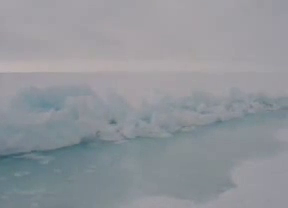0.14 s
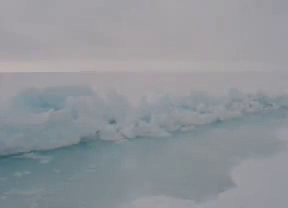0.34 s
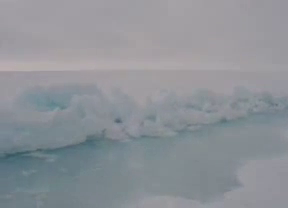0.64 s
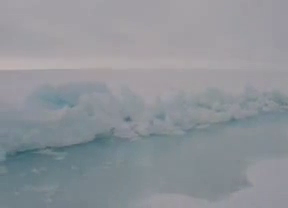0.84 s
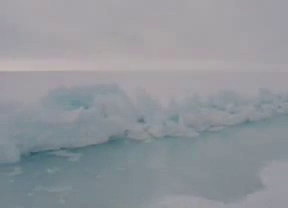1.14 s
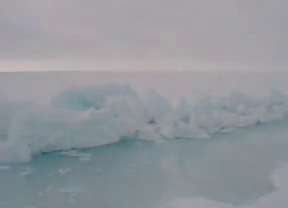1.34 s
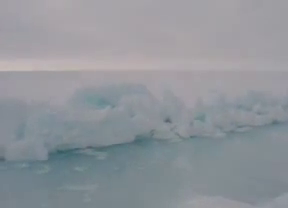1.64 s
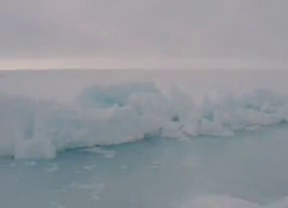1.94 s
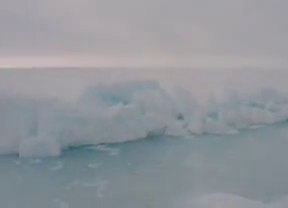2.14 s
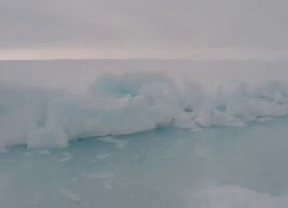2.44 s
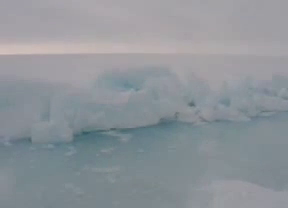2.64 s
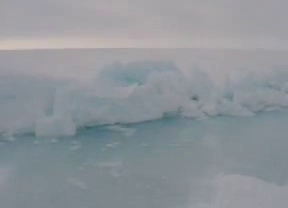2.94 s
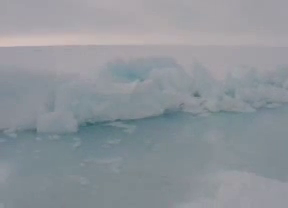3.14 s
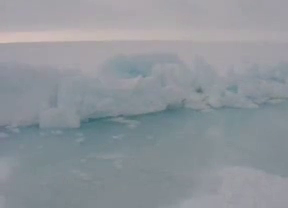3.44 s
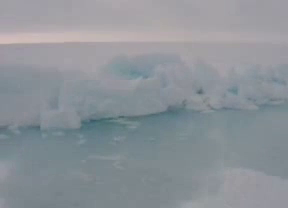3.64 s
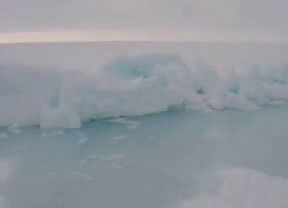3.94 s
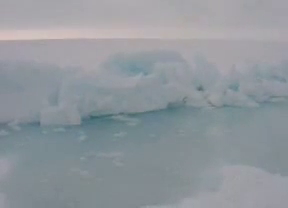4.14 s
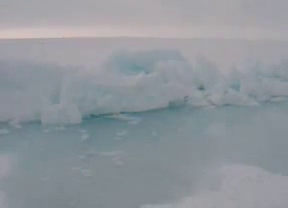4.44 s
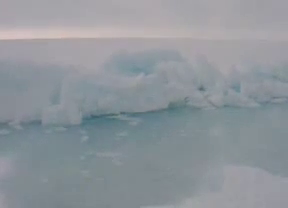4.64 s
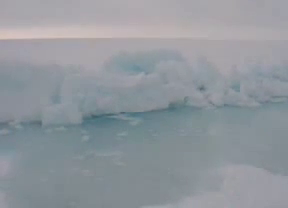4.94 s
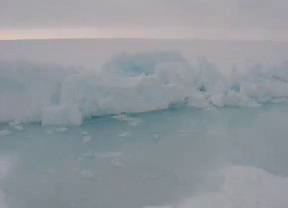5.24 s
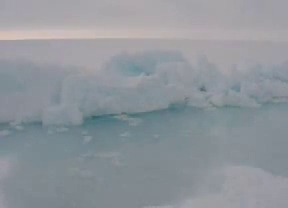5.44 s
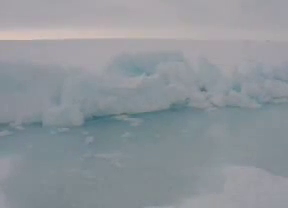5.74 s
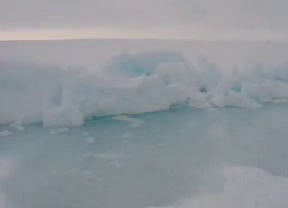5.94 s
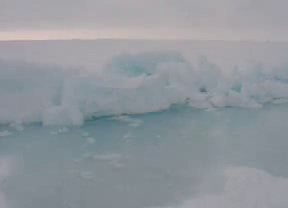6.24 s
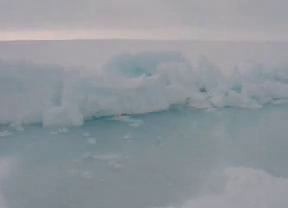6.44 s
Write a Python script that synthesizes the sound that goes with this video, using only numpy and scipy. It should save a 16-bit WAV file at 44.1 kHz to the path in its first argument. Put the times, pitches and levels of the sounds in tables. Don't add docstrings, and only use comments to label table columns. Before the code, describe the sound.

From 0 s, sea ice grinds in a harsh, continuous stuttering buzz: about forty tight slips a second, each a bright crack near 5 kHz with a duller icy body ringing at 1-3 kHz. It dips around 1 s, then swells unevenly and quickens to fifty or more a second by 3.5-4.5 s. Crushed ice hisses grainily over faint lapping water. A broad scrape and tiny chirps come at 0.6-1.1 s; dull block knocks scatter throughout, with a stronger one and a bright scrape near 3.3 s. Soft low wind thumps hit the microphone, mostly from 1.6 s and firmest at 3.9-5 s. At about 5 s the buzz slows and hardens; from 5.4 s it becomes a rattle of separate uneven jolts, about twenty-five a second. A thin wavering squeal near 850 Hz enters at 5.8 s, rising to 920 Hz by 6.4 s as crushing grows. Dry open air, coarse limited recorder tone, ending at 6.6 s.

```python
import sys
import numpy as np
from scipy import signal
from scipy.fft import rfft, irfft, next_fast_len
from scipy.io import wavfile
from scipy.ndimage import uniform_filter1d

SR = 44100
rng = np.random.default_rng(int(sys.argv[2]) if len(sys.argv) > 2 else 0)


def int16_out(signal):
    q = np.round(np.clip(np.atleast_2d(signal).T, -1, 1) * 32767)
    wavfile.write(sys.argv[1], SR, q.astype(np.int16))


def boost_factor(decibels):
    exponent = np.asarray(decibels, float) / 20
    return 10 ** exponent


N = 290619
SLIP_S, TAIL_S = 0.004, 0.006
MAX_SLIPS = 400


# pitch_hz, width_hz, level_db
CRACK_RINGS = [(5006, 346, -1), (4643, 570, -5.5), (3440, 620, -9.5), (4260, 3600, -10.5),
               (5360, 460, -6.5)]
# pitch_hz, width_hz, level_db
BODY_RINGS = [(1310, 500, -4.5), (1804, 500, -6), (2284, 254, -2.5), (2717, 340, -3), (846, 270, -8),
              (465, 300, -8)]
# time_s, along (-1..1), depth (-1..1)
CONTACT_PATH = [(0.0, 0.26, -.9), (.3, -.6, -0.87), (.6, -.8, -0.4), (1.1, 0.18, -.2), (1.5, -1.5, -.3),
                (2.1, -0.73, 0.53), (2.4, -0.29, 0.65), (2.8, 0.21, 0.34), (3.3, -0.092, 0.3),
                (3.6, 0.065, .1), (3.9, -0.099, .85), (4.2, -.4, -0.0071), (4.5, 0.032, -.15),
                (4.8, .3, 1.1), (5.15, 0.75, 0.69), (5.7, -0.21, -0.28), (6.29, -0.5, 0.38),
                (6.59, 0.27, -0.87)]


def slips(count=6):
    s, peak_db = slip_list()
    lead_s = 0.0004
    at = ((s - lead_s) * SR).astype(int)
    place = np.array(in_time(CONTACT_PATH))[:, at]
    moves = np.array([(13, 0.1), (0.1, 8.5), (0.1, 5.8), (-2.1, 0.6)])
    second, third, broad, fourth = moves @ place
    when = rng.random((MAX_SLIPS, count))[:len(s)]
    when[:, 0] = 0
    even = np.zeros(len(s))
    crack = struck(CRACK_RINGS, [even, second, third, broad, even], at, when)
    body = struck(BODY_RINGS, [even, even, even, fourth, even, even], at, when)
    usual_db, body_follows = -18.0, 0.6
    calmed_db = usual_db + body_follows * (peak_db - usual_db)
    scatter_db = 1.7 * rng.standard_normal(MAX_SLIPS)[:len(s)]
    body_db = np.minimum(peak_db, calmed_db) - 9.5 + scatter_db
    return to_height(crack, at, peak_db - 5.5) + to_height(body, at, body_db - 3.5)


# start_s, gap_ms, peak_db, swell_db (per slip)
SLIP_RUNS = [(0.0263, 26.65, -17.0, -0.28), (0.21, 25.38, -16.1, -0.42), (0.3849, 28.71, -17.5, 0.09),
             (0.554, 23.21, -19.1, 0.62), (0.6666, 24.66, -19.9, 0.13), (1.0065, 24.11, -23.2, 1.17),
             (1.1939, 24.08, -18.7, 0.59), (1.2975, 24.53, -18.4, -0.01), (1.5381, 24.93, -15.4, -0.53),
             (1.7111, 21.1, -15.4, -2.74), (1.7762, 19.45, -18.2, -0.21), (2.0323, 21.84, -19.5, -0.15),
             (2.2094, 23.37, -19.4, 0.1), (2.5324, 22.25, -16.8, 0.07), (2.8914, 22.28, -15.9, -0.09),
             (3.1133, 19.87, -15.5, -0.16), (3.3947, 20.34, -17.7, 0.02), (3.6587, 17.95, -19.4, 0.73),
             (3.7261, 24.28, -22.1, 3.37), (3.7923, 23.46, -18.3, -0.01), (3.9264, 21.14, -17.8, -0.19),
             (4.1145, 17.64, -15.0, -0.18), (4.455, 17.51, -19.3, -0.72), (4.5077, 20.59, -16.8, -0.95),
             (4.5777, 21.13, -17.2, -0.16), (4.692, 20.02, -18.3, -0.16), (4.9012, 19.56, -17.7, 0.38),
             (4.9569, 27.81, -17.0, 0.4), (5.0503, 35.13, -13.8, 0.06), (5.2209, 32.37, -13.7, 0.11)]
# start_s, peak_db
SINGLE_JOLTS = [(5.4415, -14.5), (5.474, -13), (5.4981, -17), (5.53, -15), (5.566, -12.5), (5.6, -12.0),
                (5.6428, -14.5), (5.6735, -16), (5.7062, -16.5), (5.7411, -15.5), (5.778, -14.6),
                (5.823, -14.5), (5.8587, -14.5), (5.8957, -13.5), (5.9304, -13), (5.9777, -12.0),
                (6.019, -15.5), (6.0583, -11.5), (6.0937, -13.5), (6.1348, -14.5), (6.1778, -15),
                (6.2227, -13.5), (6.2651, -16.8), (6.3099, -14), (6.3488, -13.5), (6.3866, -10.5),
                (6.4237, -13), (6.4681, -16.5), (6.5151, -17.5), (6.567, -13)]


def slip_list():
    ends = [row[0] for row in SLIP_RUNS[1:]] + [SINGLE_JOLTS[0][0]]
    rows = []
    for (start_s, gap_ms, peak_db, swell_db), end_s in zip(SLIP_RUNS, ends):
        slip_count = int(np.ceil((end_s - start_s) * 1000 / gap_ms - 0.55))
        for k in range(slip_count):
            rows.append((start_s + k * gap_ms / 1000, peak_db + k * swell_db))
    chance = rng.standard_normal((MAX_SLIPS, 3))
    s, db = np.transpose(rows)
    db = db + 0.95 * chance[:len(s), 0]
    jolt_s, jolt_db = np.transpose(SINGLE_JOLTS)
    s, db = np.append(s, jolt_s), np.append(db, jolt_db)
    long_stick_s, after_s, after_spread_s = 0.028, 0.02, 0.002
    after_db, after_scatter_db = -16, 1
    long = np.flatnonzero(np.diff(s) > long_stick_s)
    s = np.append(s, s[long] + after_s + after_spread_s * np.clip(chance[long, 1], -2, 2))
    db = np.append(db, db[long] + after_db + after_scatter_db * chance[long, 2])
    order = np.argsort(s)
    return s[order], db[order]


def struck(modes, favour_db, first, when):
    out = np.zeros(N)
    for (hz, width, mode_db), shift_db in zip(modes, favour_db):
        in_step = np.cos(2 * np.pi * hz * np.floor(SLIP_S * SR * when) / SR)
        uneven = 0.35 * rng.standard_normal((MAX_SLIPS, when.shape[1]))[:len(when)]
        direction = rng.choice([-1, 1], (MAX_SLIPS, 1))[:len(when)]
        size = (in_step + uneven) * np.exp(-2.1 * when) * direction
        force = slip_force(first, when, size, mode_db + shift_db, crumble_db=-12.5)
        out += resonance(resonance(force, hz, width), hz, width)
    return out


def slip_force(first, when, size, level_db, crumble_db):
    force, start = np.zeros(N), np.zeros(N)
    at = np.clip(first[:, None] + (SLIP_S * SR * when).astype(int), 0, N - 1)
    np.add.at(force, at, size * boost_factor(level_db)[:, None])
    start[at[:, 0]] = boost_factor(level_db + crumble_db)
    span = int(SLIP_S * SR)
    held = signal.lfilter(np.ones(span), [1], start)
    fade = np.exp(-1 / (TAIL_S * SR))
    dying = 0.3 * signal.lfilter([1], [1, -fade], np.roll(start, span))
    return force + (held + dying) * rng.standard_normal(N)


def to_height(ringing, at, peak_db):
    reached = np.sqrt(np.maximum.reduceat(uniform_filter1d(ringing ** 2, size=120), at))
    current = np.maximum(np.searchsorted(at, np.arange(N), side="right") - 1, 0)
    return ringing * (boost_factor(peak_db) / reached)[current]


# start_s, peak_db, pitch_hz
BLOCK_KNOCKS = [(0.08, -32.5, 762), (0.374, -25.5, 388), (0.608, -32, 1160), (0.669, -27, 493),
                (0.709, -21.5, 509), (1.171, -27.5, 1070), (1.319, -25.5, 1370), (1.584, -25, 1430),
                (2.379, -20.5, 880), (2.511, -25.5, 1130), (2.825, -25, 875), (3.004, -22.5, 1270),
                (3.15, -23, 1420), (3.35, -18, 1430), (4.504, -19, 1260), (4.625, -21.5, 842),
                (5.181, -25, 1310), (5.314, -28, 816), (5.411, -27, 1330), (5.471, -21.5, 1222),
                (5.707, -26.5, 1160), (6.04, -27, 910), (6.329, -25, 877), (6.419, -25, 960)]


def knocks():
    out, age = np.zeros(N), np.arange(2000) / SR
    for s, peak_db, hz in BLOCK_KNOCKS:
        blow = rng.standard_normal(len(age)) * np.exp(-age / 0.0047)
        ring = resonance(blow, hz, 450.0) + 1.5 * resonance(blow, 620.0, 790.0)
        ring = boost_factor(peak_db + 5.5) * ring / np.abs(ring).max()
        i = int(s * SR)
        out[i:i + len(age)] += ring[:N - i]
    return out


# time_s, pitch_hz, level_db
SQUEAL_LINE = [
    (5.8, 832, -45),
    (5.92, 844, -41),
    (6.0, 868.4, -47),
    (6.14, 867, -39.5),
    (6.25, 861.6, -43),
    (6.35, 895, -36.5),
    (6.42, 926, -34.5),
    (6.55, 920, -34.5),
    (6.59, 898, -38),
]


def squeal():
    hz, level_db = in_time(SQUEAL_LINE)
    rise = np.clip((np.arange(N) / SR - SQUEAL_LINE[0][0]) / 0.045, 0, 1)
    return rise * boost_factor(level_db + 2.0) * rough_line(hz, waver_hz=22.0, rough=0.72)


# start_s, length_s, start_hz, end_hz, level_db
SHORT_SQUEAKS = [
    (.6, 0.037, 2570, 2470, -39.5),
    (0.609, 0.013, 1160, 1120, -37),
    (.69, 0.08, 2480, 2430, -42.5),
    (.84, 0.025, 4600, 4500, -37),
    (.853, 0.04, 3280, 3110, -37),
    (.89, .04, 2850, 2760, -43),
    (3.147, 0.045, 1405, 1220, -37.5),
]


def squeaks():
    out, age = np.zeros(N), np.arange(3000)
    for s, length, start_hz, end_hz, level_db in SHORT_SQUEAKS:
        hz = np.interp(age, [0, length * SR], [start_hz, end_hz])
        line = rough_line(hz, waver_hz=15.0, rough=0.58)
        swell = np.sin(np.pi * np.clip(age / (length * SR), 0, 1)) ** 0.5
        i = int(s * SR)
        out[i:i + len(age)] += boost_factor(level_db + 6.5) * swell * line
    return out


def rough_line(hz, waver_hz, rough):
    slow, fast = (rms_one(uniform_filter1d(rng.standard_normal(len(hz)), size=size)) for size in (700, 150))
    return (1 + rough * fast) * np.sin(2 * np.pi * np.cumsum(hz + waver_hz * slow) / SR)


# start_s, length_s, level_db, pitch_hz, width_hz
ICE_SLIDES = [
    (0.663, 0.49, -34.5, 2230, 2600),
    (2.826, 0.04, -36, 4900, 1385),
    (3.315, .062, -27.5, 5440, 1200),
    (3.312, 0.073, -30.5, 2100, 2520),
    (3.721, 0.013, -31.5, 4900, 1700),
    (4.389, 0.015, -31.5, 4800, 1900),
    (6.1, 0.19, -45.5, 1400, 910.4),
]


def slides():
    out, t = np.zeros(N), np.arange(N) / SR
    rubbing = grains(2500, spread_db=0.5, smooth=0.76)
    for s, length, level_db, hz, width in ICE_SLIDES:
        attack, release = (t - s) / 0.002, (s + length - t) / (0.25 * length)
        contact = np.clip(np.minimum(attack, release), 0, 1)
        out += boost_factor(level_db) * contact * rms_one(resonance(rubbing, hz, width))
    return out


# time_s, level_db, fineness_db (extra level of the bright grains)
CRUSHING = [(0.0, -37.5, 6), (0.46, -39.5, -4.5), (.6, -37.5, 1.5), (0.88, -35, 1.5), (1.47, -36.5, 1.5),
            (2.24, -35, -0.5), (2.79, -35.5, -1), (3.4, -35, 0), (3.9, -34, 0), (4.42, -34, 1),
            (5, -33.5, 1), (5.82, -33.5, 0.5), (6.37, -31.5, -0.5), (6.59, -30.5, 5)]
# pitch_hz, level_db (per Hz)
BRIGHT_COLOUR = [(1650, -35), (2800, -6), (3050, -8), (3410, -5), (4110, -8), (4650, -4), (4820, -5),
                 (5020, 0), (5250, -5), (5600, -6), (7150, -36)]
# pitch_hz, level_db (per Hz)
DULL_COLOUR = [(530, -37.5), (900, -6), (1030, -3.5), (1310, 5), (2460, -1), (2740, -3), (2990, 0),
               (3400, -7.5), (4420, -31), (7480, -120)]
# pitch_hz, level_db (per Hz)
WATER_COLOUR = [(94, -37.5), (160, -4), (214, -4.5), (303, 2), (379, -3), (532, -1), (606, -4), (857, -3.5),
                (1100, -7), (1430, -33), (2420, -120)]


def brash():
    vigour_db, fine_db = in_time(CRUSHING)
    splinters = colour(grains(3000, spread_db=7.5, smooth=0.44), BRIGHT_COLOUR)
    bright = boost_factor(vigour_db + fine_db - 5.0) * splinters
    lumps = colour(grains(1500, spread_db=5.0, smooth=0.73), DULL_COLOUR)
    dull = boost_factor(vigour_db - 2.26) * lumps
    water_db = -41.5 + 0.16 * (vigour_db - vigour_db.mean())
    lapping = colour(grains(600, spread_db=2.5, smooth=1.5), WATER_COLOUR)
    return bright + dull + boost_factor(water_db + 1.0) * lapping


# time_s, level_db
WIND_LEVEL = [(0.0, -52.5), (4.0, -49), (4.68, -48.5), (4.86, -48.5), (5.34, -51), (6.59, -49.5)]
# start_s, peak_db
WIND_THUMPS = [(0.819, -49), (1.58, -38.5), (2.119, -41), (2.872, -39), (2.999, -54), (3.469, -42.5),
               (3.729, -38), (3.901, -33), (4.739, -34), (4.949, -32), (5.019, -33)]
# pitch_hz, level_db (per Hz)
GUST_COLOUR = [(8.8, -29), (15, -8), (19, -3.5), (27, -23), (32, -6.5), (161, -4), (200, -10), (260, -27.5),
               (440, -120)]


def wind():
    level_db, = in_time(WIND_LEVEL)
    push, age = np.zeros(N), np.arange(6000) / SR
    for s, peak_db in WIND_THUMPS:
        i = int(s * SR)
        push[i:i + len(age)] += boost_factor(peak_db - 4.5) * np.minimum(age / 0.0047, 1) * np.exp(-age / 0.034)
    return (boost_factor(level_db) + push) * colour(grains(60, spread_db=0.5, smooth=4.1), GUST_COLOUR)


def grains(per_s, spread_db, smooth):
    sizes = boost_factor(spread_db * np.minimum(rng.exponential(1, N), 4)) * rng.choice([-1, 1], N)
    clicks = sizes * (rng.random(N) < per_s / SR)
    return rms_one(clicks) + smooth * rng.standard_normal(N)


def colour(x, points):
    size = next_fast_len(N)
    hz, db = np.transpose(points)
    axis = np.log(np.fft.rfftfreq(size, 1 / SR) + 1)
    shape = boost_factor(np.interp(axis, np.log(hz), db, left=-80, right=-80))
    return rms_one(irfft(rfft(x, size) * shape, size)[:N])


def resonance(x, hz, width):
    r = np.exp(-np.pi * width / SR)
    feed = np.array([1, 0, -1]) * (1 - r * r) / 2
    back = [1, -2 * r * np.cos(2 * np.pi * hz / SR), r * r]
    return signal.lfilter(feed, back, x + 1e-18)


def rms_one(x):
    return x / np.sqrt(np.mean(x ** 2) + 1e-20)


def in_time(rows):
    s, *columns = np.transpose(rows)
    return [np.interp(np.arange(N) / SR, s, c) for c in columns]


def scene():
    return (slips() + brash() + slides() + squeaks() + knocks() + squeal() + wind())[None]


def top_cut(x):
    return signal.sosfilt(signal.butter(12, 8130, fs=SR, output="sos"), x)


# pitch_hz, level_db
REBUILD_EDGE = [(5600, -1), (6400, -3.5), (6800, -5), (7000, -14), (7100, -31), (8200, -55.5), (9000, -79)]


def record(dry):
    step, offset = 4, 0.0043
    guard = signal.cheby2(10, 40, 6150, fs=SR, output="sos")
    sampled = np.zeros_like(dry)
    sampled[:, ::step] = step * signal.sosfilt(guard, dry)[:, ::step]
    size = next_fast_len(N)
    edge = boost_factor(np.interp(np.fft.rfftfreq(size, 1 / SR), *np.transpose(REBUILD_EDGE), right=-140))
    rebuilt = irfft(rfft(sampled, size) * edge, size)[:, :N]
    return top_cut(rebuilt + offset)


dry = scene()
out = record(dry)
int16_out(out)
```